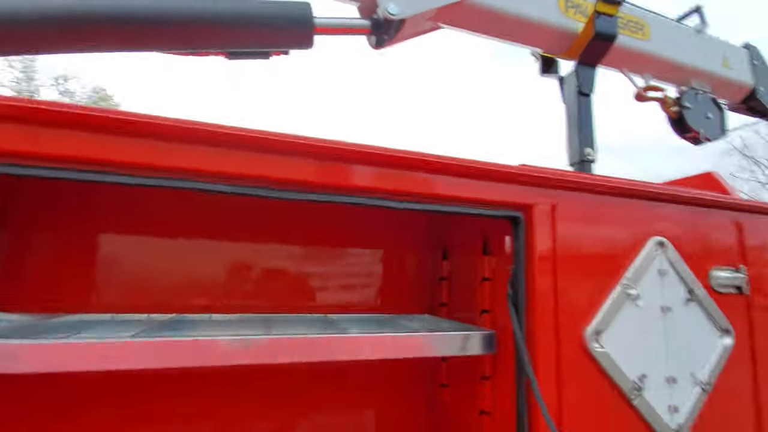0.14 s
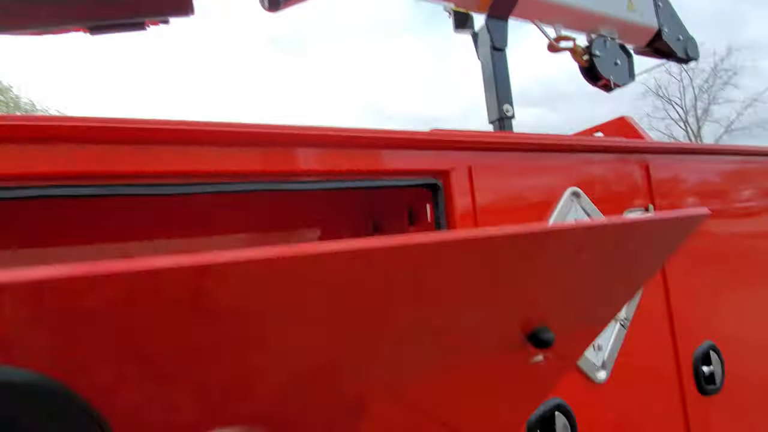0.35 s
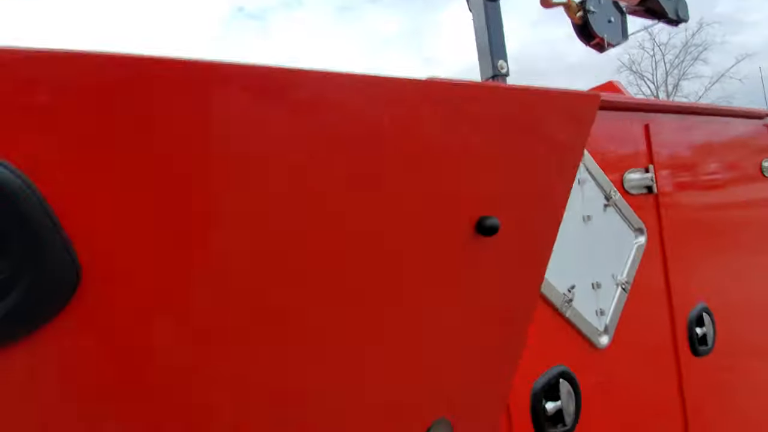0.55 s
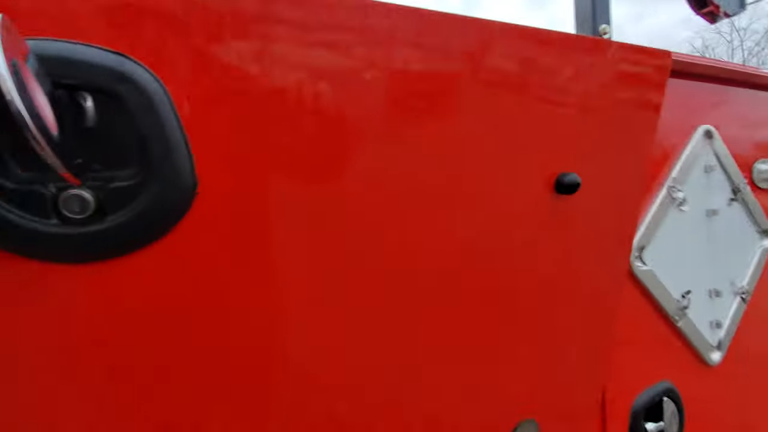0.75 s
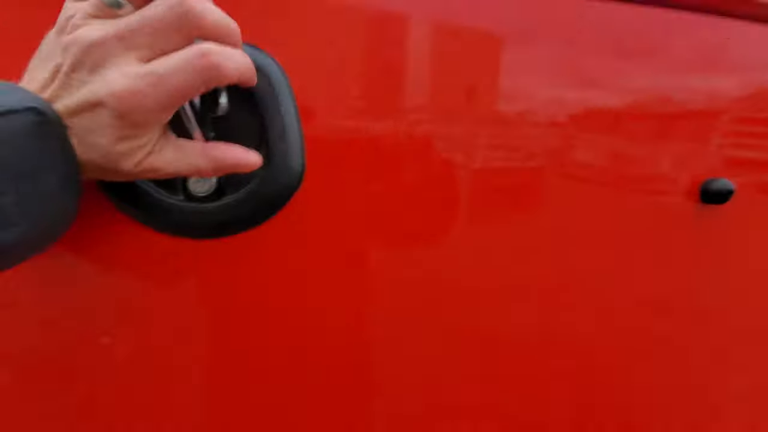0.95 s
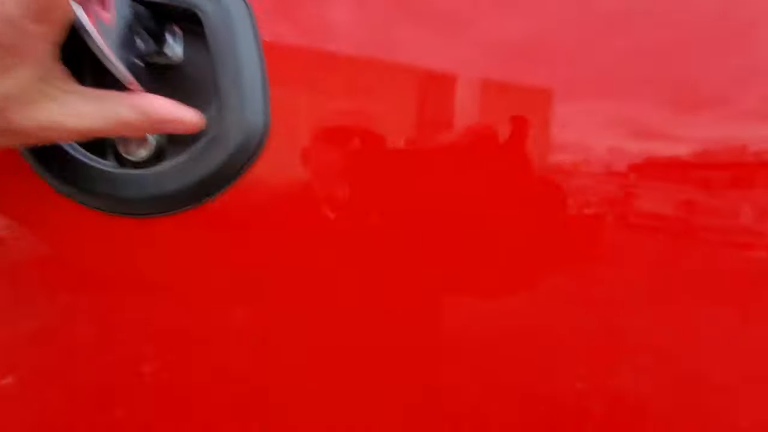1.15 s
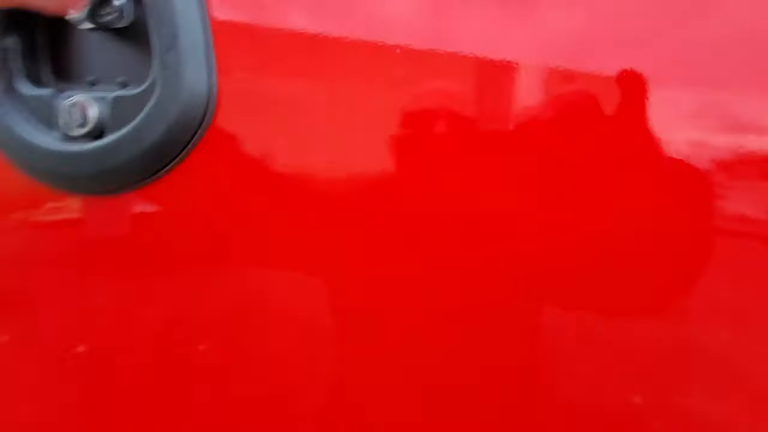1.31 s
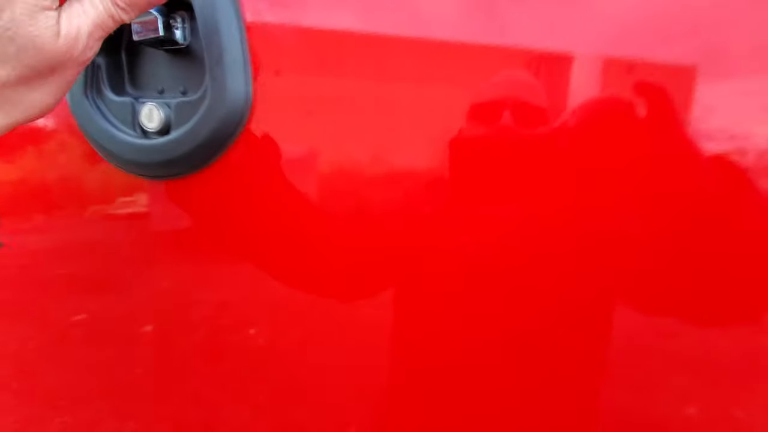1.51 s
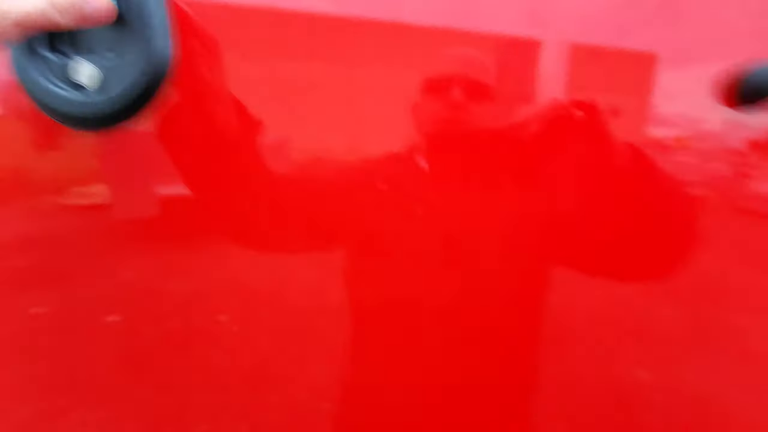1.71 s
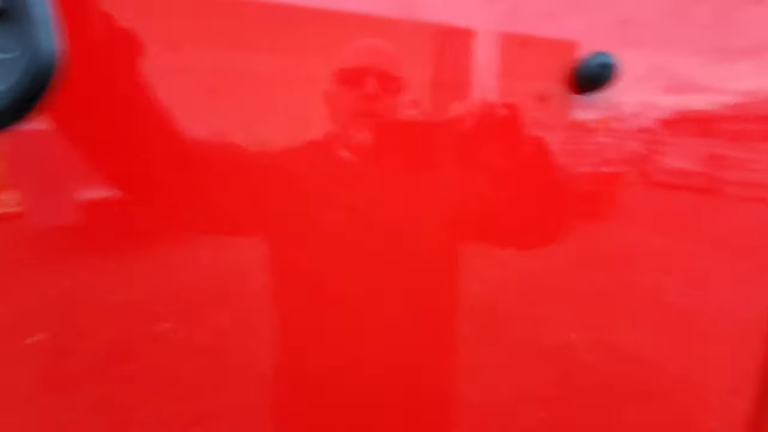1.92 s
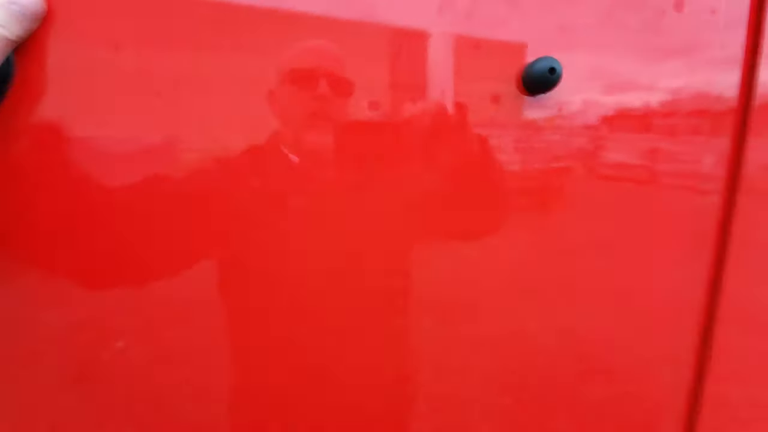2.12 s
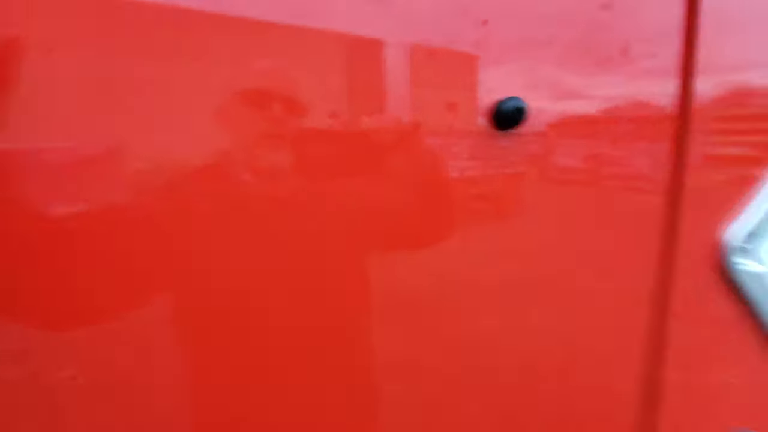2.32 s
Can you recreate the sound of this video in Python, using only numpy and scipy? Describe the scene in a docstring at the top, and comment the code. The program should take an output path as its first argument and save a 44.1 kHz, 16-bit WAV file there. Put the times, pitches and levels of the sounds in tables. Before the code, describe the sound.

A metal truck compartment door snaps, slams shut and latches with sharp clunks outdoors.

```python
"""A steel compartment door on a truck body, outdoors, close to a stereo pair of microphones.
Wind rumbles on the microphones from the start, over a distant outdoor hum. The handle snaps, a sleeve
rustles and the rods tick. The door swings up and slams on its frame about a second in; then the latch
is turned and pushed home. Each blow rings the sheet metal, dense in the treble and with a few clear
panel modes below."""
import sys
import numpy as np
from scipy import signal
from scipy.fft import rfft, irfft
from scipy.io import wavfile

SR = 44100
rng = np.random.default_rng(int(sys.argv[2]) if len(sys.argv) > 2 else 0)


def put_to_file(sound):
    """Save the sound as 16-bit audio at rate SR, in the file named by the first command-line argument."""
    columns = np.atleast_2d(sound).T  # one column per channel
    safe = np.clip(columns, -1, 1)
    whole_steps = np.round(safe * 32767)
    wavfile.write(sys.argv[1], SR, whole_steps.astype(np.int16))


N = 104031

BAND_EDGES_HZ = 25 * 2 ** np.arange(0, 9.5, 1 / 3)
BAND_HZ = np.sqrt(BAND_EDGES_HZ[1:] * BAND_EDGES_HZ[:-1])
# Base time the steel takes to fall 60 dB: frequency_hz, ring_s
STEEL_RING = [(60, 0.58), (300, .45), (2200, 0.23), (12000, 0.12)]


def door(sheet):
    """Each blow cracks, rings the sheet band by band and shakes the panel; the truck body rings on."""
    # Blows of handle, door and latch: start_s, crack_db, five levels_db (one at each colour_hz),
    # swell_s, hold_s, ring_factor, favoured_hz, boost_db
    blows = [(0.0736, -13, -43.5, -28, -15, -13.5, -13, 0.0015, 0.019, 0.79, 3010, 9.1),
             (0.115, -38, -39, -35.5, -32.5, -32.5, -22.5, 0.00081, 0.002, 0.5, 1130, 4),
             (1.005, -46, -37, -36, -45.5, -51.5, -75, 0.0011, 0.018, 0.57, 689, 2.2),
             (1.0456, -22, -24, -25, -19.5, -17.5, -64, 0.0024, 0.0078, 0.89, 253, 16),
             (1.06, -18, -24.5, -23, -22, -30.5, -26.5, 0.0024, 0.027, 0.85, 253, 14),
             (1.1114, -30, -33, -40, -34, -39, -45, 0.0017, 0.037, 2.46, 253, 8.1),
             (1.3335, -33.5, -35, -31.5, -28, -37.5, -47, 0.0076, 0.015, 0.51, 253, 12),
             (1.3554, -37, -27.5, -42, -26, -39.5, -42, .003, 0.023, 1.05, 505, 9.4),
             (1.4813, -14, -29.5, -20.5, -19.5, -29, -29, 0.00033, 0.013, 0.76, 717, 12.1),
             (1.598, -46, -34.5, -45.5, -44.5, -54, -51, 0.0011, 0.015, 0.6, 200, 9.9),
             (1.938, -29.5, -24.5, -26.5, -29, -38, -61, 0.0015, 0.0092, 0.56, 200, 5.3),
             (1.9963, -33, -31.5, -46, -59, -49, -67, 0.0024, 0.0085, 0.52, 226, 3),
             (2.074, -55, -39, -46.5, -45, -58, -69, 0.0072, 0.036, 1.9, 425, 3),
             (2.172, -11, -26.5, -22, -18.5, -23, -33, 0.00033, 0.0033, 1.164, 1890, 15.7),
             (2.198, -50, -38, -34.5, -52, -50, -31, 0.0038, 0.016, 0.59, 227, 9.5)]
    # Points on which a blow's spectrum is drawn: frequency_hz
    colour_hz = [200, 650, 2200, 6000, 12000]
    # Clear modes of the door panel: pitch_hz
    modes_hz = [155, 200, 226, 253, 294, 425, 505, 689, 770, 851, 965, 1130, 1205, 1700, 1890, 2325, 3010]
    thump_hz, crack_t60_s, body_db, body_stretch = 60.3, 0.017, -29, 2.59
    out = np.zeros((2, N))
    ring_s = at_hz(STEEL_RING, BAND_HZ)[:, None]
    hold_share = ring_s / 0.29  # bands that ring longer also hold longer
    grain = from_db(2 * drift(73))
    scatter_db = 3.5 * rng.standard_normal((len(blows), len(modes_hz)))
    shake = rng.standard_normal((2, N))
    crack = signal.sosfilt(signal.butter(1, 1200, "high", fs=SR, output="sos"), stereo(shake, 0.16))
    for blow, mode_scatter_db in zip(blows, scatter_db):
        start_s, crack_db, *levels_db, swell_s, hold_s, ring_factor, favoured_hz, boost_db = blow
        span = slice(int(start_s * SR), min(int((start_s + 0.45) * SR), N))
        t = np.arange(span.stop - span.start) / SR
        colour = [(thump_hz, levels_db[0] - 9), *zip(colour_hz, levels_db)]
        sheet_fall = envelope(t, swell_s, hold_s * hold_share, ring_factor * ring_s) * grain[span]
        body_fall = from_db(body_db) * envelope(t, swell_s, hold_s, body_stretch * ring_s)
        band_gains = (sheet_fall + body_fall) * from_db(at_hz(colour, BAND_HZ))[:, None]
        sound = np.einsum("bct,bt->ct", sheet[:, :, span], band_gains) / np.sqrt(5)
        sound += from_db(crack_db) * crack[:, span] * envelope(t, 0, 0, crack_t60_s)
        force = shake[:, span] * envelope(t, swell_s, hold_s, crack_t60_s)
        for hz, chance_db in zip(modes_hz, mode_scatter_db):
            nearness = np.exp(-(np.log2(hz / favoured_hz) / 0.14) ** 2)  # a bell 0.14 octave wide
            mode_db = at_hz(colour, hz) + 0.5 + boost_db * nearness + chance_db
            sound += from_db(mode_db) * panel_mode(force, hz, ring_factor) / 2
        add(out, start_s, sound)
    return out


def panel_mode(force, hz, ring_factor):
    """One clear mode of the panel: a damped resonator shaken by the blow."""
    t60_s = 0.78 * ring_factor * at_hz(STEEL_RING, hz)
    radius, angle = from_db(-60 / (t60_s * SR)), 2 * np.pi * hz / SR
    mode = signal.lfilter([0, 1], [1, -2 * radius * np.cos(angle), radius ** 2], force + 1e-18)
    return metal_stereo(mode / np.abs(mode).max(axis=1, keepdims=True), hz)


def sheet_noise(mode_count=220, width_hz=35):
    """The dense ring of the sheet: noise through many narrow, scattered modes, wider in the treble."""
    hz = np.fft.rfftfreq(N, 1 / SR)
    modes_hz = 200 * 80 ** rng.random(mode_count) ** 0.6  # 200 Hz to 16 kHz
    peaks = sum(1 / (1 + ((hz - mode) / (width_hz * np.sqrt(mode / 2000))) ** 2) for mode in modes_hz)
    return irfft(rfft(rng.standard_normal((2, 2, N))) * (0.13 + peaks), N)


def metal_stereo(pair, hz):
    """The wide sheet reaches the two microphones alike in the bass only."""
    # The sheet's stereo image: frequency_hz, likeness, left_over_right_db
    image = [(100, 0.96, -0.5), (407, 0.78, 1), (1190, 0.017, -3), (4600, 0.018, 2.5), (12100, 0.1, -0.5)]
    return stereo(pair, at_hz(image, hz)) * pan(at_hz(image, hz, column=2))


def linkage_ticks(sheet, slope_db_per_octave=-8):
    """Short knocks of rods and hinge, each coloured around its own pitch."""
    # Knocks in the linkage: start_s, level_db, pitch_hz
    ticks = [(0.471, -48.5, 11000), (0.499, -38.5, 2310), (0.519, -34.5, 890), (0.559, -42.5, 1800),
             (.578, -42.5, 1500), (1.454, -42.5, 2620), (2.111, -40, 595), (2.124, -45, 2350),
             (2.136, -44, 1700)]
    out, t = np.zeros((2, N)), np.arange(SR // 10) / SR
    fall = envelope(t, swell_s=0.0023, hold_s=0, t60_s=0.1)
    for start_s, level_db, pitch_hz in ticks:
        start = int(start_s * SR)
        band_gains = from_db(slope_db_per_octave * np.abs(np.log2(BAND_HZ / pitch_hz)))
        knock = np.tensordot(band_gains, sheet[:, :, start:start + len(t)], 1)
        add(out, start_s, from_db(level_db) * rms_one(knock) * fall)
    return out


def sleeve(noise):
    """A sleeve rustles near the microphones: soft bursts of bright, grainy cloth noise."""
    # Moves of the sleeve: start_s, length_s, level_db
    rustles = [(0.319, 0.065, -51), (0.372, 0.1, -48.5), (0.465, 0.054, -47.5), (0.736, 0.1, -57.5),
               (1.61, 0.054, -51), (1.362, 0.046, -42.5)]
    # Spectrum of the cloth: frequency_hz, density_db
    colour = [(3000, -16), (7000, -16.5), (12000, -5), (15800, -6.5)]
    t = np.arange(N) / SR
    bursts = sum(from_db(level_db) * np.sin(np.pi * np.clip((t - start_s) / length_s, 0, 1))
                 for start_s, length_s, level_db in rustles)
    grain = from_db(2.6 * drift(88))
    return bursts * grain * flickering_noise(noise, colour, likeness=0.14, flicker_db=4, rate_hz=40)


def wind(noise):
    """Gusts rumble on the microphones, harder on the right."""
    # Course of the gusts: time_s, level_db
    gusts = [(0.0, -22.5), (0.12, -40), (1.21, -31), (2.32, -38), (2.36, -40)]
    # Spectrum of the rumble: frequency_hz, density_db
    colour = [(25, -20), (45, -4.5), (70, 0.5), (130, -11), (400, -38.5)]
    gust_db = np.interp(np.arange(N) / SR, *np.transpose(gusts))
    rumble = flickering_noise(noise, colour, likeness=0.96, flicker_db=6.5, rate_hz=7.3)
    return from_db(gust_db) * pan(-5) * rumble


def distant_hum(noise, start_db=-42.5, fade_db_per_s=2.5):
    """The outdoors far off: a wide, low wash of noise that slowly fades."""
    # Spectrum of the hum: frequency_hz, density_db
    colour = [(150, 0.5), (480, -15), (850, -18), (2080, -25.5), (5000, -37), (10000, -41), (15800, -30.5)]
    fade = from_db(start_db - fade_db_per_s * np.arange(N) / SR)
    return fade * flickering_noise(noise, colour, likeness=0.13, flicker_db=1, rate_hz=10)


def flickering_noise(noise, colour, likeness, flicker_db, rate_hz):
    """Coloured stereo noise that flickers band by band; rms 1."""
    inside = (BAND_HZ > colour[0][0]) & (BAND_HZ < colour[-1][0])
    out = np.zeros((2, N))
    for hz, pair in zip(BAND_HZ[inside], noise[inside]):
        gain = from_db(at_hz(colour, hz) + flicker_db * drift(rate_hz))
        out += gain * np.sqrt(hz) * stereo(pair, likeness)
    return rms_one(out)


def third_octaves(pairs):
    """Splits noise into bands of rms 1; neighbouring bands come from unrelated pairs."""
    filters = [signal.butter(2, edges, "band", fs=SR, output="sos")
               for edges in zip(BAND_EDGES_HZ, BAND_EDGES_HZ[1:])]
    return np.array([rms_one(signal.sosfilt(sos, pairs[k % 2])) for k, sos in enumerate(filters)])


def drift(rate_hz):
    """A smooth random wander of rms 1."""
    step, settle = 20, 2000  # samples per step, steps dropped while the filter settles
    pole = np.exp(-2 * np.pi * rate_hz * step / SR)
    white = rng.standard_normal(N // step + settle + 2)
    slow = signal.lfilter([1], [1, -2 * pole, pole ** 2], white)[settle:]
    return np.interp(np.arange(N) / step, np.arange(len(slow)), rms_one(slow))


def envelope(t, swell_s, hold_s, t60_s):
    """Swell, hold, then an exponential fall."""
    rise = np.clip(t / max(swell_s, 1e-4), 0, 1)
    return rise * from_db(-60 * np.maximum(t - swell_s - hold_s, 0) / t60_s)


def stereo(pair, likeness):
    """Left and right from two noises, from unrelated (0) to identical (1)."""
    mid, side = np.sqrt(1 + likeness) * pair[0], np.sqrt(1 - likeness) * pair[1]
    return np.array([mid + side, mid - side]) / np.sqrt(2)


def pan(left_over_right_db):
    """Gains for the left and right microphone."""
    return from_db(left_over_right_db * np.array([[0.5], [-0.5]]))


def add(out, start_s, sound):
    """Places a stereo sound at its time."""
    start = int(start_s * SR)
    out[:, start:start + sound.shape[1]] += sound


def at_hz(points, hz, column=1):
    """Reads a table on a log-frequency axis."""
    points = np.array(points)
    return np.interp(np.log(hz), np.log(points[:, 0]), points[:, column])


def from_db(db):
    """Decibels to gain."""
    return 10 ** (np.asarray(db) / 20)


def rms_one(x):
    """Scales to rms 1."""
    return x / np.sqrt(np.mean(x ** 2) + 1e-20)


def scene():
    """Door, linkage and sleeve close by, wind on the microphones, hum in the distance."""
    metal = third_octaves(sheet_noise())
    sheet = np.array([metal_stereo(pair, hz) for pair, hz in zip(metal, BAND_HZ)])
    air = third_octaves(rng.standard_normal((2, 2, N)))
    background = wind(air) + distant_hum(air[:, :, ::-1])  # reversed noise, unrelated to the wind
    return door(sheet) + linkage_ticks(sheet) + sleeve(air) + background


def record(dry):
    """The recorder rounds the peaks, thins the lowest bass and top treble, then cuts off at 17 kHz."""
    rounded = 1.5 * np.tanh(dry / 1.5)
    low_cut = signal.sosfilt(signal.butter(2, 35, "high", fs=SR, output="sos"), rounded)
    dulled = signal.sosfilt(signal.cheby2(10, 40, 16100, fs=SR, output="sos"), low_cut)
    shelved = 0.25 * low_cut + 0.75 * dulled
    return signal.sosfilt(signal.cheby2(12, 60, 17000, fs=SR, output="sos"), shelved)


dry = scene()
out = record(dry)
put_to_file(out)
```